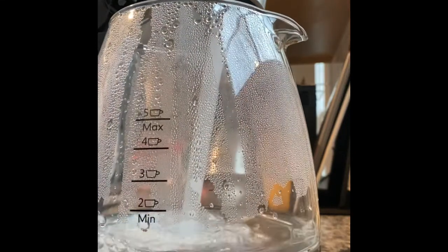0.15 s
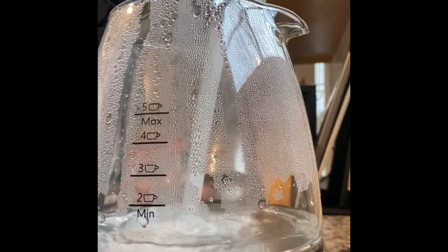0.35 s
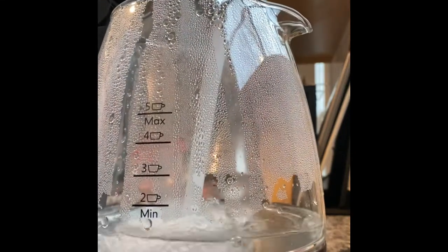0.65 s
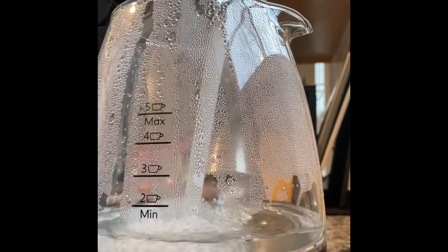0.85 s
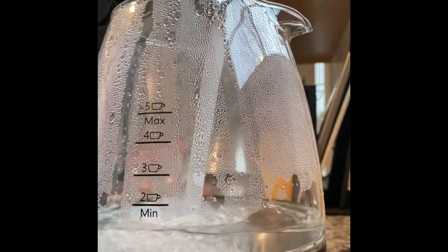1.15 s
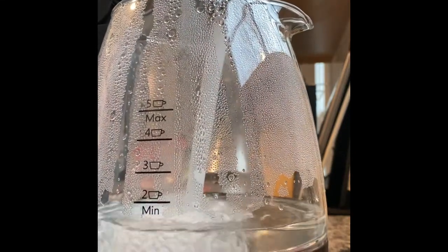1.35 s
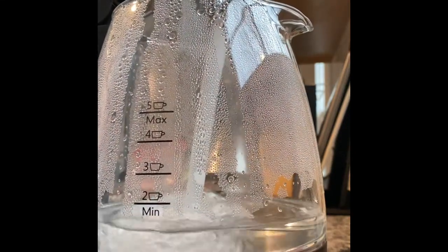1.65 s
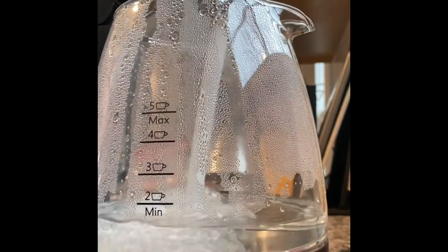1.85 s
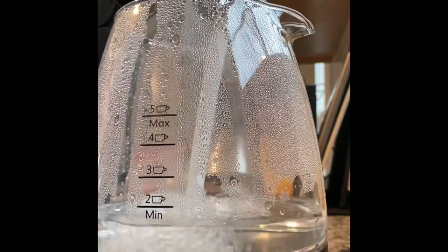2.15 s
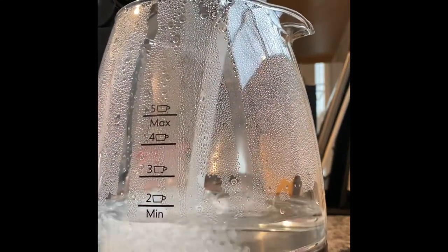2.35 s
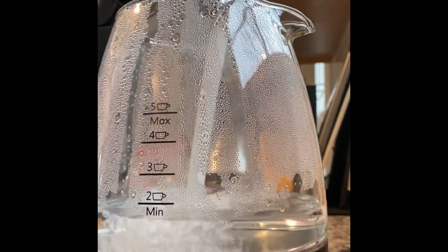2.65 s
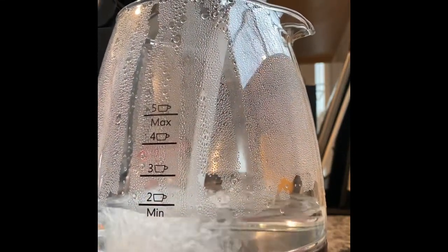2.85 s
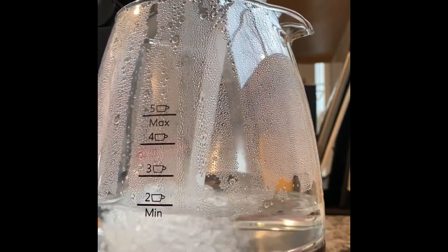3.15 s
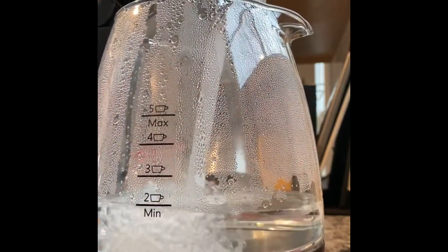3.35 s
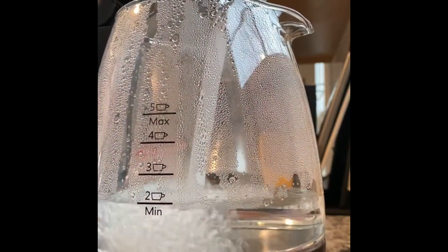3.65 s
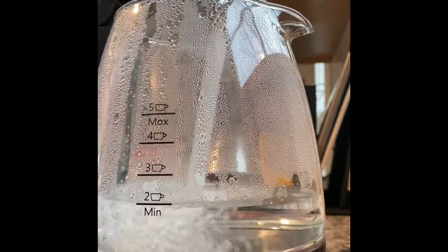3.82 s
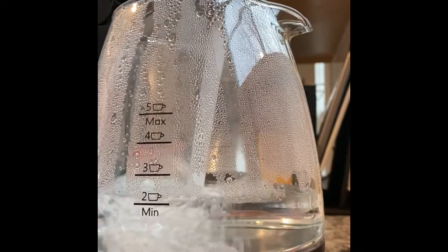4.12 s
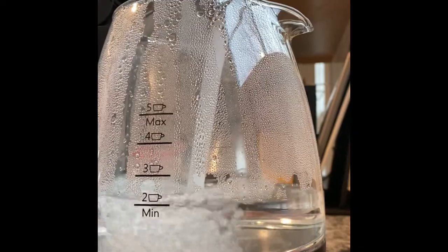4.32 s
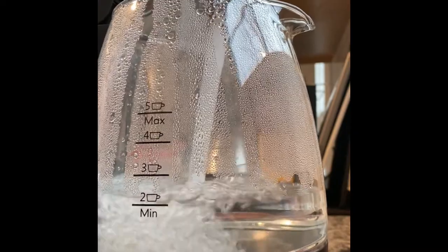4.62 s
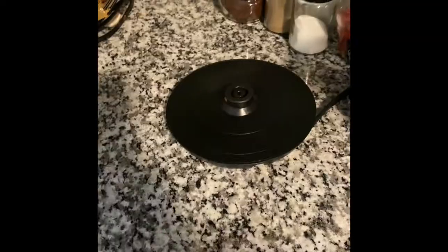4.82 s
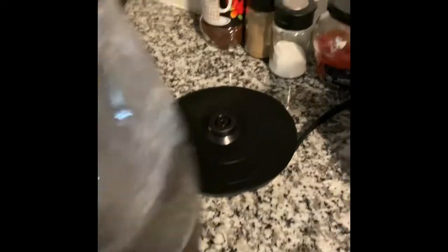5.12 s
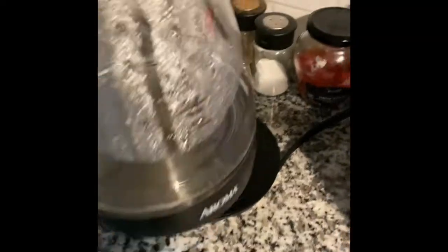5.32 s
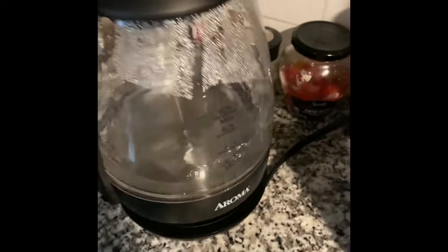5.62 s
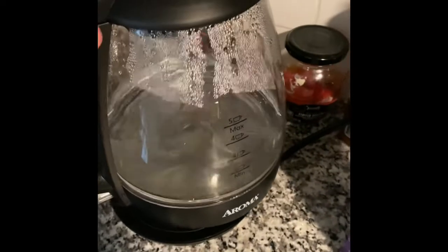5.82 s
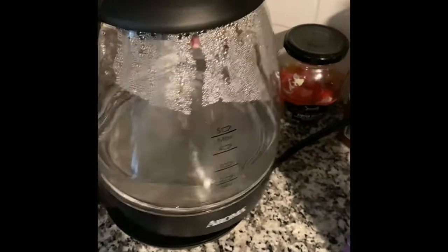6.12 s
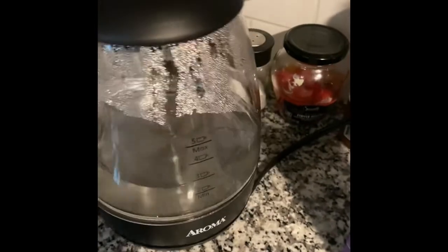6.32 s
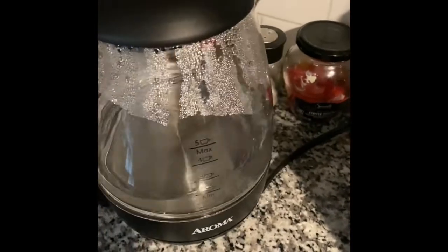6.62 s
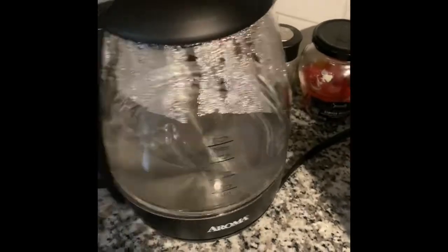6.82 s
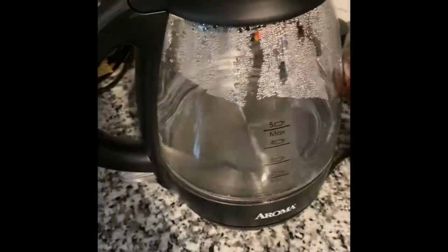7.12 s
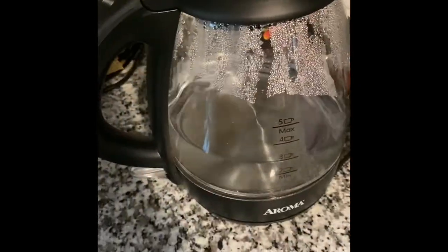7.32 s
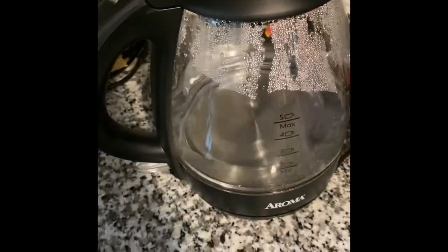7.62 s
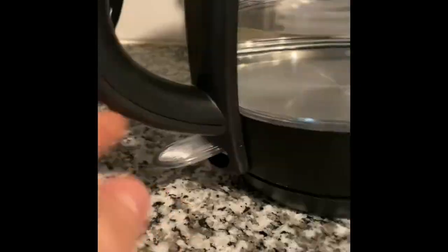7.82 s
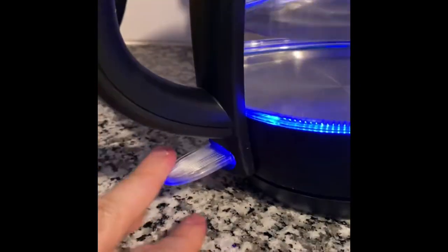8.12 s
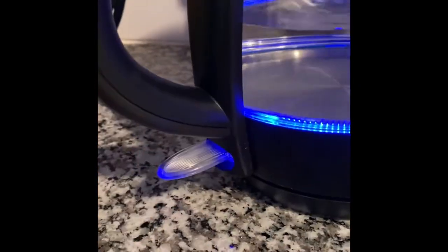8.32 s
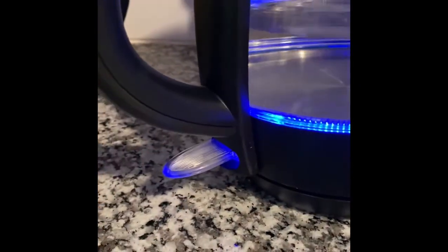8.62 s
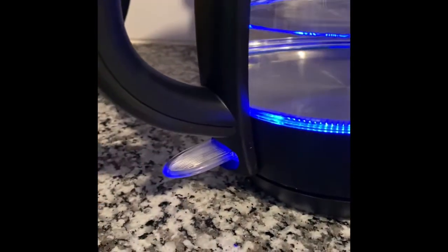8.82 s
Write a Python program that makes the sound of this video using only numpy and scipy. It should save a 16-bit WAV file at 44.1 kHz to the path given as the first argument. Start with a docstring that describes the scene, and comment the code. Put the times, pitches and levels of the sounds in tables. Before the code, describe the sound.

From 0 to about 4.8 s a kettle boils hard, very near: a broad rushing hiss, wavering and thinning slightly, with watery low gurgles that swell around 1.3 to 2 s and then ease. At 4.8 s it drops abruptly to silence, opening on a quiet tiled kitchen with a low fridge hum. Soft skin rubs and tiny ticks follow, with two brighter glassy clinks near 5.5 s. Dull knocks at 5.85 s lead to a fast, loud plastic clatter from 6.1 to 6.4 s, strongest about 6.2 s, with low counter thumps and a short echo. Faint ticks and brushing fade into near stillness. A second dip comes at 7.7 s, then fingers slide, a small tap at 7.87 s, and a loud, sharp switch snap at 7.94 s. Duller rebounds follow at 8.04 and 8.14 s, then light rubbing, a very faint heater whine, and a soft release tick near 8.56 s over the hum.

```python
"""A glass kettle at a hard boil hisses and gurgles: noise with peaks and hollows, pops through air modes.
A dip to silence ends the boil; a hand then swings the kettle over a stone counter and rattles it onto its base.
After a second dip a finger snaps the switch down: blows ring tables of modes, sliding skin is grainy noise.
A fridge hums behind. Left and right differ in level and phase by amounts that vary with pitch."""
import sys
import numpy as np
from scipy import signal
from scipy.fft import rfft, irfft, next_fast_len
from scipy.io import wavfile
from scipy.ndimage import uniform_filter1d, map_coordinates

SR = 44100
rng = np.random.default_rng(int(sys.argv[2]) if len(sys.argv) > 2 else 0)


def generate_wav(sig):
    """Save sig (samples, or channels by samples) to the path in sys.argv[1] as 16-bit PCM at SR."""
    pcm = np.round(np.clip(np.atleast_2d(sig).T, -1, 1) * 32767).astype(np.int16)
    wavfile.write(sys.argv[1], SR, pcm)


N = 395577
T = np.arange(N) / SR

# Dips to silence. Each row: centre in seconds, fade on either side in seconds.
BREAKS = [(4.773, 0.031), (7.705, 0.034)]
# Switch lever, its snap and rebounds. Each row: start in seconds, peak in dB, drive of the counter thump in dB,
# scrape in seconds, hardness in dB per octave, favoured ring in Hz, favoured thump in Hz.
SNAPS = [(7.931, -20.5, -46, 0.018, 2.5, 1900, 66), (7.94, -3, -39, 0.0045, 0.6, 2300, 66),
         (8.037, -23, -38.5, 0.0013, -9, 1150, 79), (8.136, -26, -36.5, 0.0011, -9.5, 1155, 100),
         (8.561, -53, -43.5, 0.0065, -9.5, 453, 54.46)]
# Modes of the kettle base. Each row: pitch in Hz, level in dB, t60 in seconds.
BASE = [(509.5, -13.5, 0.027), (643, 0, 0.04), (746, -3.5, 0.036), (891, 4.5, .04), (1170, 0, 0.017),
        (1330, 1, 0.065), (1621, 0.5, 0.032), (1722, 1, 0.049), (1920, 8, 0.014), (2257, 4, 0.021),
        (2610, 13.5, 0.0025), (3130, -1.5, 0.017), (3670, 6.5, 0.0053), (4250, -13.5, 0.0074),
        (5800, -11, 0.0068), (6400, -18, 0.0043)]


def boil():
    """Steam bubbles collapse into hiss; big ones gurgle in the air above the water."""
    hiss_db, sag_db_per_s = -37.5, 0.48  # the hiss thins out slowly
    size = next_fast_len(int(BREAKS[0][0] * SR))
    hiss = boil_hiss(size) * undb(hiss_db - sag_db_per_s * T[:size])
    # the gurgle is stronger on the right
    both = hiss + gurgle(size) * undb([[-9.0], [3.0]])
    return np.pad(both, ((0, 0), (0, N - size))) * (T < BREAKS[0][0])


def boil_hiss(size):
    """Countless small collapses sum to coloured noise, its pitches bent by the heaving water."""
    # Sum of the channels of the hiss, nearly empty from 8 to 12 kHz while their difference stays. # Each row:
    # pitch in Hz, relative level in dB per Hz.
    hiss_mid = [(45, -30), (71, 0), (120, -24), (177, 4.5), (293, 1.5), (468, -5.5), (562, -13.5),
                (2020, -4), (2530, -4.5), (2910, -7.5), (6170, -4.5), (8040, -15), (8900, -90),
                (9460, -135), (11800, -14), (15400, -6)]
    # Difference of the channels before the peaks. Each row: pitch in Hz, relative level in dB per Hz.
    hiss_side = [(71, -51), (120, -22), (173, -7), (276, -11), (468, -0.5), (539, -8), (1270, -11),
                 (1550, -8), (1820, -6.5), (2530, -1.5), (3720, -7), (5250, 0), (8900, 0), (15400, -7)]
    # Likeness of difference to sum. Each row: pitch in Hz, lean from -1 (right) to 1 (left).
    hiss_lean = [(120, -0.79), (450, -1.14), (700, -0.18), (1400, -0.31), (1750, 0.7), (2400, -0.074),
                 (15800, 0.087)]
    # Peaks and hollows of the hiss. Each row: pitch in Hz, width in Hz, gain in dB.
    hiss_peaks = [(182, 7.6, 7), (1453, 120, 9), (2220, 26, 4.5), (2550, 118, 11.5), (3650, 61, -8.5),
                  (4114, 87, 11), (4780, 330, -10), (5336, 47, 10), (5810, 250, 4), (6450, 100, 5.5),
                  (6830, 150, 4.5), (7370, 48, 14), (8030, 380, -17), (10000, 130, 21), (10000, 310, -8.5)]
    # Later change of the hiss's colour. Each row: pitch in Hz, width in Hz, gain in dB.
    late_peaks = [(3380, 390, 1.5), (3990, 270, -6), (4880, 480, 7.5), (5550, 850, -3), (8030, 430, 18)]
    change_s = (2.2, 3)
    ripple_db = 0.8  # fine roughness of the colour
    slosh_share, slosh_per_s = 0.005, 9  # pitch bend, spread as a share of pitch

    colour_db = humps(hiss_peaks, size) + ripple_db * walk(SR / 200, size // 2 + 1)
    mid_db = along(hiss_mid, size) + colour_db
    side_db = along(hiss_side, size) + colour_db
    hiss = wash(size, mid_db, side_db, hiss_lean, shift=0.66, flicker_db=1.8, swell_db=0.1, step=1 / 3)

    changed = np.interp(T[:size], change_s, [0, 1])
    late_hiss = irfft(rfft(hiss) * undb(humps(late_peaks, size)), size)
    hiss = (1 - changed) * hiss + changed * late_hiss

    place = np.arange(size) + np.cumsum(slosh_share * walk(slosh_per_s, size))
    return np.array([map_coordinates(v, [place], order=4, mode="wrap") for v in hiss])


def gurgle(size):
    """Big bubbles pop at random and ring the air over the water."""
    # Modes of the air. Each row: pitch in Hz, level in dB, t60 in seconds.
    air_modes = [(239, 1.5, 0.28), (310, -12.5, 0.027), (376, 0, 0.1), (405.7, 3, 0.16), (464.8, 10, 0.15)]
    # Swell of the gurgle before the channels' offsets. Each row: time in seconds, level in dB.
    gurgle_swell = [(0.0, -57), (.5, -51), (1.3, -44.5), (2.0, -44), (3.0, -47.5), (4.76, -51)]
    bubbles_per_s = 320
    hits = (rng.random(size) < bubbles_per_s / SR) * rng.standard_normal(size)
    pops = hits * undb(1.6 * np.minimum(rng.exponential(size=size), 3.5))
    rung = ring(band(pops, 280, 495), air_modes, 0.96)
    return level(rung, 0) * undb(np.interp(T[:size], *np.transpose(gurgle_swell)))


def blows(events, body, crack, crack_hz, rattle):
    """Each blow rings the body, cracks in the treble, rattles loose parts and then shakes the counter."""
    # Modes of the counter. Each row: pitch in Hz, level in dB, t60 in seconds.
    counter = [(53, -2, 0.35), (67, -4.5, 0.21), (83, -0.5, 0.21), (100, -7, 0.11), (136.8, -10, .1),
               (191, -8, 0.17), (270, -10, .08), (334, -10, 0.08)]
    thump_lag_s = 0.01
    touch = 0.95  # first touch re the scrape that follows
    blow_top_hz, dulling_db_per_oct = 10870, 7.5  # softer blows lose an octave of top per this much hardness
    crack_db, crack_db_per_hardness = crack  # re peak at hardness 0, gain per step of hardness
    rattle_db, rattle_s = rattle  # re peak at hardness 0, decay time

    out, thump = np.zeros(N), np.zeros(N)
    shove = np.pad(np.hanning(110) / np.hanning(110).sum(), (0, SR // 2))
    for s, db, thump_db, scrape_s, hard_db, spot_hz, thump_hz in events:
        push = burst(scrape_s)
        # one sharp push within the scrape
        push[20] += touch * np.abs(push).max()

        rung = ring(push, struck(body, spot_hz, hard_db, 0.012))
        top_hz = blow_top_hz * 2 ** (min(hard_db, 0) / dulling_db_per_oct)
        add(out, s, peak(band(rung, 0.65 * body[0][0], top_hz), db))

        add(out, s, peak(band(push, *crack_hz), db + crack_db + crack_db_per_hardness * hard_db))

        loose = burst(rattle_s) * undb(2.2 * walk(80, len(push)))
        add(out, s, peak(band(loose, 700, 3100), db + rattle_db + hard_db))

        shaken = ring(shove, struck(counter, thump_hz, 0, 0.03), 1)
        add(thump, s + thump_lag_s, undb(thump_db) * shaken)
    return out, thump


def struck(body, spot_hz, hard_db, detune):
    """A body's modes as one blow finds them: tilted by hardness, lifted near the spot, a little detuned."""
    spot_db, spot_oct = 6, 0.081  # the struck spot lifts modes near its favoured pitch
    bend = 1 + detune * rng.standard_normal(len(body))
    modes = []
    for (hz, db, t60), d in zip(body, bend):
        tilt_db = hard_db * np.log2(hz / 1000)
        lift_db = spot_db / (1 + (np.log2(hz / spot_hz) / spot_oct) ** 2)
        modes.append((hz * d, db + tilt_db + lift_db, t60))
    return modes


def ticks():
    """Light contacts: two pitches, a crowd of noise around them and a broad crack."""
    # Ticks, clinks and soft knocks of lid, handle, base and lever. Each row: start in seconds, peak in dB,
    # ring in Hz, second ring in Hz, t60 of the first ring in seconds, scrape in seconds.
    tick_table = [(4.791, -53, 1075, 3380, 0.0071, 0.018), (4.812, -52, 1410, 2130, 0.019, 0.0073),
                  (5.12, -45, 1070, 3000, 0.011, 0.012), (5.276, -39.5, 11600, 9100, 0.014, .004),
                  (5.305, -41, 2750, 6160, 0.018, 0.014), (5.315, -38, 1800, 2636, 0.11, 0.0022),
                  (5.366, -45, 2480, 3760, 0.098, .004), (5.445, -34.5, 12100, 10640, 0.0094, 0.004),
                  (5.541, -25.5, 4600, 5320, 0.027, 0.0044), (5.547, -25, 4180, 4700, 0.031, 0.0071),
                  (5.598, -47, 1175, 2350, 0.013, 0.0047), (5.611, -44, 4040, 6705, .018, 0.0046),
                  (6.335, -29, 499, 640, 0.027, 0.0052), (6.423, -30.5, 492, 2320, 0.081, 0.00056),
                  (6.648, -50, 2400, 1320, 0.019, 0.0075), (6.714, -45, 2374, 5330, 0.013, 0.0033),
                  (6.834, -68, 6010, 2000, 0.011, 0.0035), (7.315, -70, 1510, 2479, .012, 0.0044),
                  (7.6, -63, 1100, 1492, 0.012, 0.0035), (7.865, -33.5, 686, 803, 0.023, 0.0014),
                  (8.553, -59.5, 6600, 5450, .013, 0.0052), (8.563, -43, 289.1, 253.2, 0.075, 0.0036)]
    second_ring_db, crowd_db = -3.5, -4
    crack_top_db, crack_hz, crack_db_per_oct = -8.5, 2500, -2.5  # crack is strongest for ticks near crack_hz
    out = np.zeros(N)
    for s, db, hz, second_hz, t60, scrape_s in tick_table:
        push = burst(scrape_s)
        crack_db = crack_top_db + crack_db_per_oct * abs(np.log2(hz / crack_hz))
        modes = [(hz, 0, t60), (second_hz, second_ring_db, 0.49 * t60)]
        add(out, s, peak(ring(push, modes), db))
        crowd = band(burst(1.8 * scrape_s), min(hz, second_hz), 1.2 * max(hz, second_hz))
        add(out, s, peak(crowd, db + crowd_db))
        add(out, s, peak(band(push, 1500, 13000), db + crack_db))
    return out


def rub():
    """Grainy friction of skin and plastic, dull scrape under bright hiss; strokes grip, swell, sag, let go."""
    # Each row: start, loudest moment and end in seconds, first grip in dB, loudest in dB, dull part re level in dB.
    strokes = [(5.033, 5.112, 5.17, -63, -51.5, -13), (5.276, 5.302, 5.54, -77, -58.5, -10),
               (5.45, 5.622, 5.68, -80, -54.5, -9.5), (6.022, 6.127, 6.16, -86, -59.5, 16.5),
               (6.17, 6.247, 6.4, -59.5, -60, 12.5), (6.625, 6.722, 6.8, -66, -61.5, -1.5),
               (6.986, 7.024, 7.1, -82, -74, 0), (7.747, 7.84, 7.91, -56.5, -47.5, -5),
               (7.88, 7.9, 8.25, -55, -49.5, -8), (8.25, 8.343, 8.55, -74, -62, -8),
               (8.54, 8.556, 8.62, -73.5, -74, 1)]
    end_db, grip_s, let_go_s = -22.5, 0.006, 0.021  # end_db re loudest
    body_db = -5  # the base's own rings within the dull scrape
    grain = rng.standard_normal(N) * undb(1.6 * walk(220, N))
    dull = level(band(grain, 680, 2800), 0) + level(ring(grain, BASE), body_db)
    bright = level(band(grain, 4600, 17000), 0)
    out = np.zeros(N)
    for start, top, end, grip_db, db, dull_db in strokes:
        edges = np.clip((T - start) / grip_s, 0, 1) * np.clip((end - T) / let_go_s, 0, 1)
        swell_db = np.interp(T, [start, top, end], [grip_db, db, db + end_db])
        out += edges * undb(swell_db) * (undb(dull_db) * dull + bright)
    return out


def heater():
    """The element sings faintly, as wavering sines, after the switch closes."""
    # Each row: pitch in Hz, typical amplitude in dB.
    element_tones = [(1320, -76), (1430, -85)]
    out = 0
    for hz, db in element_tones:
        waver = undb(db + 2.5 * walk(8, N))
        out = out + waver * np.sin(2 * np.pi * (hz * T + rng.random()))
    return out * (T > SNAPS[1][0])


def kitchen():
    """Rumble of the house with the blurred hum and whirr of a fridge, as noise with humps."""
    # Sum of the channels before the fridge. Each row: pitch in Hz, relative level in dB per Hz.
    kitchen_mid = [(12, -33.5), (30, -19.5), (49, 1), (124, -9.5), (189, -31.5), (211, -22.5), (398, -20.5),
                   (433, -27), (540, -21), (587, -27.5), (966, -39), (1350, -40), (2040, -49.5),
                   (3460, -55), (6500, -58.5), (8500, -76), (15000, -79.5)]
    # Difference of the channels before the fridge and side_offset_db.
    # Each row: pitch in Hz, relative level in dB per Hz.
    kitchen_side = [(12, -47.5), (20, -29), (92, -8.5), (151, -18), (377, -10), (497, -10.5), (540, 0),
                    (674, -25), (733, -5), (889, -21.5), (1460, -19), (2100, -33), (15000, -49)]
    # Likeness of difference to sum. Each row: pitch in Hz, lean from -1 (right) to 1 (left).
    kitchen_lean = [(20, -.3), (120, -.5), (400, -0.5), (800, -.1), (15000, 0.068)]
    # Humps of the fridge. Each row: pitch in Hz, width in Hz, gain in dB.
    fridge = [(179, 17, 16.5), (270, 19, 8), (352, 27, 8.5), (407, 11, 6.5), (583.4, 12, 6), (716, 19, 11),
              (1470, 200, 0.5), (1797, 290, 6), (2530, 890, -6.5), (3400, 330, 12.5)]
    kitchen_db, side_offset_db = -49.5, -16
    size = next_fast_len(N)
    hum_db = humps(fridge, size)
    mid_db = along(kitchen_mid, size) + hum_db
    side_db = along(kitchen_side, size) + side_offset_db + hum_db
    air = wash(size, mid_db, side_db, kitchen_lean, shift=0.46, flicker_db=1.6, swell_db=0.6, step=1)
    return air[:, :N] * undb(kitchen_db)


def near_stereo(x, width, lean, room_db):
    """A near sound in stereo: the channels differ in level, by a quarter-cycle shift and in their echoes."""
    scatter_per_s = 800
    size = next_fast_len(N)
    lean = np.clip(along(lean, size), -1, 1)
    angle = np.arctan(undb(along(width, size)))
    direct = rfft(x, size)
    echo, other = rfft(room(room_db), size)
    # cluttered walls blur narrow rings over neighbouring pitches
    blurred = rfft(x * walk(scatter_per_s, N), size)
    total = (direct + blurred * echo) * np.cos(angle)
    shifted = lean + 1j * np.sqrt(1 - lean ** 2)
    diff = (direct * shifted + blurred * other) * np.sin(angle)
    return np.sqrt(2) * irfft([total + diff, total - diff], size)[:, :N]


def room(db):
    """Two noise tails of the tiled walls, decaying band by band."""
    # Each row: band in Hz, t60 in seconds, gain in dB before a slight treble cut.
    walls = [(150, 1, -2), (500, 0.68, -2.5), (1490, 0.81, -1.5), (4000, 0.68, -0.5), (10030, 0.6, -1)]
    t = T[:SR]
    tail = 0
    for hz, t60, gain_db in walls:
        noise = band(rng.standard_normal((2, SR)), hz / 3.3, hz * 1.5)
        tail = tail + noise * undb(gain_db - 60 * t / t60) / hz ** 0.066
    tail = tail * np.clip(t / 0.0045, 0, 1)
    return tail * undb(db) / np.sqrt(np.sum(tail[0] ** 2))


def wash(size, mid_db, side_db, lean, shift, flicker_db, swell_db, step):
    """Stereo noise in bands step octaves wide that swell together and flicker alone."""
    a, b = rfft(rng.standard_normal((2, size)))
    lean = np.clip(along(lean, size), -1, 1)
    # shift: share of the unlike part that is the same noise a quarter cycle on
    apart = 1j * shift * a + np.sqrt(1 - shift ** 2) * b
    side = lean * a + np.sqrt(1 - lean ** 2) * apart
    pair = np.array([a * undb(mid_db), side * undb(side_db)])
    octave = np.log2(np.fft.rfftfreq(size, 1 / SR) + 1)
    out, swell = 0, walk(1.0, size)
    for centre in np.arange(4, 15, step):
        share = np.clip(1 - np.abs(octave - centre) / step, 0, 1)
        gain_db = swell_db * swell + flicker_db * walk(12 / step, size)
        out = out + irfft(pair * share, size) * undb(gain_db)
    return np.array([out[0] + out[1], out[0] - out[1]]) / np.sqrt(np.mean(out[0] ** 2))


def humps(peaks, size):
    """Peaks and hollows (Hz, width Hz, dB) as dB at every bin of a spectrum."""
    hz = np.fft.rfftfreq(size, 1 / SR)
    return sum(db / (1 + (2 * (hz - f) / width) ** 2) for f, width, db in peaks)


def along(table, size):
    """A (Hz, value) table read at every bin of a spectrum."""
    hz, value = np.transpose(table)
    return np.interp(np.log(np.fft.rfftfreq(size, 1 / SR) + 1), np.log(hz), value)


def ring(x, modes, sign=-1):
    """Decaying modes driven by x; with sign -1 neighbours swing against each other."""
    out = 0
    for k, (hz, db, t60) in enumerate(modes):
        pole = np.exp(2j * np.pi * hz / SR - np.log(1000) / (t60 * SR))
        out = out + sign ** k * undb(db) * signal.lfilter([1], [1, -pole], x).imag
    return out


def burst(scrape_s):
    """Noise of a contact that grates for a moment."""
    t = T[:SR // 2]
    return rng.standard_normal(len(t)) * t ** 0.22 * np.exp(-t / max(scrape_s, 0.0003) * 1.01)


def walk(rate, size):
    """Random levels held 1 / rate s and slewed twice; spread near 1."""
    k = int(SR / rate)
    held = np.repeat(rng.standard_normal(size // k + 1), k)
    return 1.34 * uniform_filter1d(uniform_filter1d(held, k), k)[:size]


def band(x, lo_hz, hi_hz):
    """Band-pass from lo_hz to hi_hz."""
    sos = signal.butter(2, [lo_hz, min(hi_hz, 0.45 * SR)], "band", fs=SR, output="sos")
    return signal.sosfilt(sos, x)


def undb(db):
    """Amplitude factor of a level in dB."""
    return 10 ** (np.asarray(db) / 20)


def level(x, db):
    """x scaled to an rms in dB."""
    return x * undb(db) / np.sqrt(np.mean(x ** 2))


def peak(x, db):
    """x scaled to a peak in dB."""
    return x * undb(db) / np.abs(x).max()


def add(out, s, x):
    """Mix x into out from s seconds on."""
    i = int(s * SR)
    out[i:i + len(x)] += x[:N - i]


def scene():
    """Boil, handling and switch over the kitchen, with dips to silence."""
    # Kettle on base. Each row: start in seconds, peak in dB, drive of the counter thump in dB, scrape in seconds,
    # hardness in dB per octave, favoured ring in Hz, favoured thump in Hz.
    knock_table = [(5.846, -22, -34.5, 0.0058, -6, 715, 53), (5.910, -28, -37, 0.0046, -7, 706, 87),
                   (6.113, -34, -46, 0.012, -2.5, 1750, 62), (6.137, -22, -39, 0.0058, -6, 870, 66),
                   (6.151, -24.5, -32.5, 0.0044, -2.5, 866, 66), (6.183, -13.5, -26, 0.0085, 0, 900, 190),
                   (6.202, -10, -29, 0.0056, 2, 1330, 190), (6.228, -4, -21.5, 0.0035, 0.5, 854, 84),
                   (6.245, -22.5, -34, 0.0052, -1.5, 1800, 270.4),
                   (6.265, -24, -36, 0.0033, -5.5, 1750, 120), (6.296, -25.5, -35, 0.0063, 0, 900, 100),
                   (6.325, -18, -34, 0.0027, 2, 1680, 139), (6.348, -21.5, -35, 0.008, 1, 1430, 139),
                   (6.36, -25.5, -27.5, 0.0027, -1, 900, 67), (6.392, -36, -35, 0.0065, 9, 1860, 100),
                   (6.422, -28, -36.5, 0.004, -12, 693, 66), (7.03, -70, -41.5, .012, -12, 597, 99.7)]
    # Modes of the switch lever. Each row: pitch in Hz, level in dB, t60 in seconds.
    lever = [(342.7, -24.5, 0.083), (438, -6.5, 0.075), (545, 0, 0.031), (871, -13, 0.066),
             (1127, -0.5, 0.042), (1408, 6, 0.023), (1675, 2, 0.027), (1897, 4, 0.02), (2327, 2.5, 0.024),
             (2500, -10, 0.015), (2826, -3, 0.025), (3136, -15.5, 0.011), (3820, -14, 0.0099)]
    # Stereo width before and after the last dip, very wide at 8 to 11 kHz before it.
    # Each row: pitch in Hz, side level re middle in dB.
    widths = [
        [(60, 0), (200, -19), (400, -8), (800, -0.5), (2400, 0.5), (5000, -2.5), (7000, 4.5), (8500, 26.5),
         (11000, 25), (12500, 6.5)],
        [(60, -21), (200, 6), (400, -7), (1300, 4), (2400, -4), (5000, -5), (8500, 5.5), (10000, -1),
         (11500, -5), (14000, 8.5)],
    ]
    # Likeness of side to middle, before and after. Each row: pitch in Hz, lean from -1 (right) to 1 (left).
    leans = [
        [(300, -.3), (700, 0.85), (2000, 0.37), (8000, -0.15)],
        [(300, -.3), (1000, -.05), (8000, -.03)],
    ]
    # Echo level in dB, before and after the last dip.
    room_levels = [-21, -21.5]

    knocks, thud = blows(knock_table, BASE, crack=(-8, 1.5), crack_hz=(2200, 9500), rattle=(-12.5, 0.014))
    snaps, bump = blows(SNAPS, lever, crack=(-8, 3.3), crack_hz=(2500, 16000), rattle=(-34, 0.11))
    near = knocks + snaps + ticks() + rub()
    late = T > BREAKS[1][0]
    handled = near_stereo(near * ~late, widths[0], leans[0], room_levels[0])
    handled = handled + near_stereo(near * late, widths[1], leans[1], room_levels[1])
    fades = np.prod([np.clip(np.abs(T - s) / fade_s, 0, 1) for s, fade_s in BREAKS], axis=0)
    return (boil() + kitchen() + heater() + handled + thud + bump) * fades


def record(dry):
    """The phone cuts the deep bass, rounds the loudest peaks and cuts the top."""
    bass_hz, top_hz, headroom = 44, 15730, 0.95
    dry = signal.sosfilt(signal.butter(5, bass_hz, "high", fs=SR, output="sos"), dry)
    rounded = headroom * np.tanh(dry / headroom)
    return signal.sosfilt(signal.ellip(14, 0.2, 80, top_hz, fs=SR, output="sos"), rounded)


dry = scene()
out = record(dry)
generate_wav(out)
```